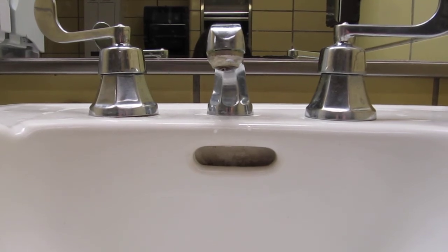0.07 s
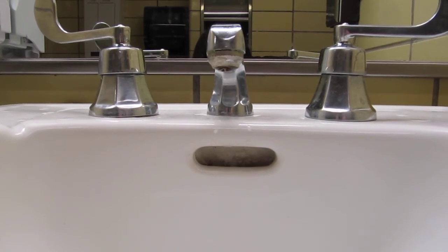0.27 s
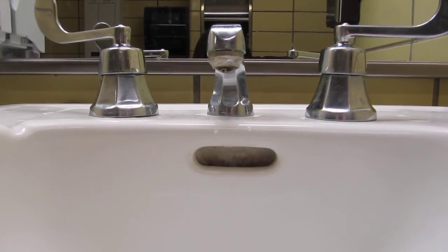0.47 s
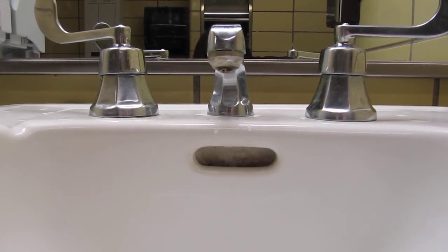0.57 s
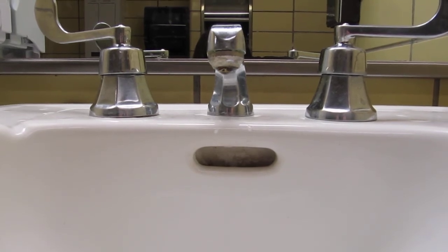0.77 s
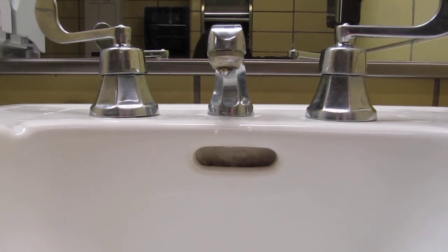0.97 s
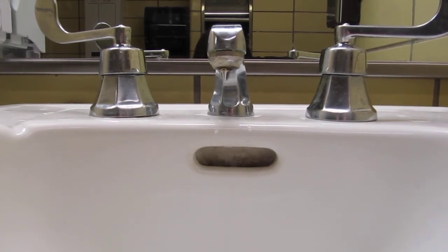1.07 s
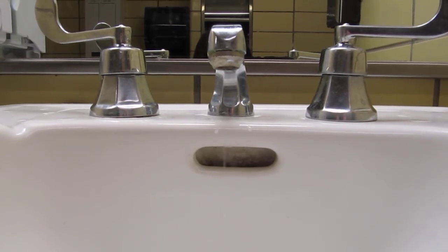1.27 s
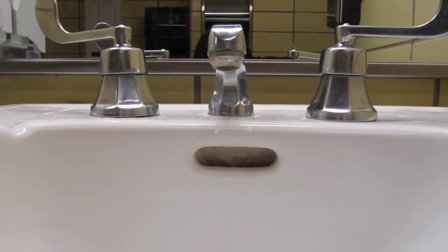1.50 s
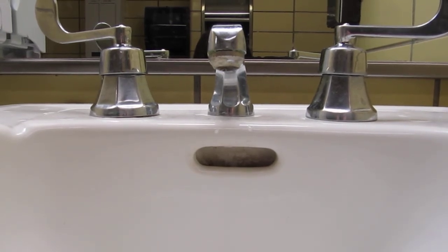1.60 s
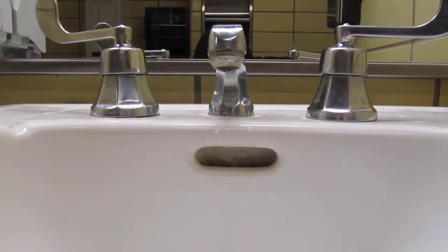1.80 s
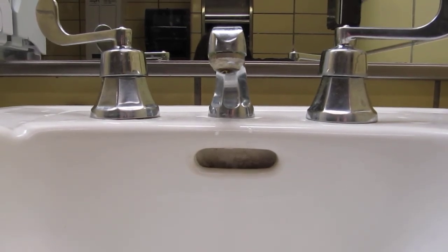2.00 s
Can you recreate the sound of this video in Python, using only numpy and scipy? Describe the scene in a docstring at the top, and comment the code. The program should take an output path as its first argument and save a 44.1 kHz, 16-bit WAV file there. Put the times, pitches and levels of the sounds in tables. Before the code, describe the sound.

A dripping faucet: one sharp plink with a very faint rebound, a pause, then a second similar plink and barely audible spray, heard close up in a reverberant tiled washroom with soft ventilation and electrical hum.

```python
"""A drop is heard first: a tick and a short plink from a leaky faucet over the wet drain of a porcelain sink.
Each impact is a noise burst; its trapped bubble is a decaying sine, and drain and basin ring as damped modes.
Bits of spray follow as faint high noise ticks, and the tiled washroom adds echoes and reverberation.
Behind lie ventilation as shaped noise, mains hum as harmonics, a thin lamp buzz and a steady whine."""
import sys
import numpy as np
from scipy import signal
from scipy.fft import rfft, irfft
from scipy.io import wavfile

SR = 44100
rng = np.random.default_rng(int(sys.argv[2]) if len(sys.argv) > 2 else 0)


def bounce(signal):
    """Save signal as a 16-bit WAV file at the path given by the first command-line argument."""
    frames = np.transpose(np.atleast_2d(signal))
    limited = np.clip(frames, -1, 1)
    pcm = np.round(limited * 32767).astype(np.int16)
    wavfile.write(sys.argv[1], SR, pcm)


N = 90404
T = np.arange(N) / SR   # time, s

# Drops landing in the drain, the weak one a rebound; ring and tick levels are relative to the drop:
# start_s, level_db, pitch_hz (bubble), t60_s (bubble), basin_db, tick_db, brightness_db (at the top of the colour)
DROPS = [(0.2083, -6, 1986, 0.038, 6.5, 3.5, 7), (0.3607, -27.5, 2177, 0.023, -13, -1, -6),
         (1.5205, -6.5, 1907, 0.029, 0.5, 2, -5)]
# Relative spectrum of the impact: frequency_hz, level_db
IMPACT_COLOUR = [(200, -43.5), (430, -10.5), (1200, 5), (3400, -1), (5500, 0), (6800, 6), (8800, -2),
                 (10700, 3.5), (11600, -8.5), (13700, -13), (15800, -19)]
# Damped modes of drain and basin, levels relative to each other: frequency_hz, level_db, t60_s
BASIN_MODES = [(467, -46.5, 0.2), (669, -45, 0.074), (1224, -41, 0.046), (1546, -30, 0.051),
               (2243, -5.5, .011), (2870, -22.5, 0.034), (2925, -24, 0.04), (3846, -51, 0.22),
               (4073, -29, 0.014), (4932, -39, 0.033), (6360, -48, .04), (9590, -32, 0.011),
               (9765, -24, 0.012)]
# Spray landing on the porcelain: start_s, level_db
SPRAY_DROPLETS = [(1.6335, -37), (1.733, -42)]
# Relative spectrum of the spray: frequency_hz, level_db
SPRAY_COLOUR = [(4000, -70), (7000, -22), (8700, -15), (9600, 6), (10800, -4), (11700, -14), (13000, -5),
                (14500, -33), (15800, -28)]
# Reflections from the bowl and the near wall: delay_s, level_db
EARLY_ECHOES = [(.003, -39), (.006085, -24), (.0218, -28)]
# Reverberation of the tiled room, levels relative between bands: frequency_hz, t60_s, level_db
ROOM_DECAY = [(400, 1.1, 7), (1200, 2.3, 8.5), (2000, 0.99, -4.5), (3040, 2.08, 1), (5000, .55, 14),
              (12000, 0.44, -7)]
# Spectral density of ventilation and hiss: frequency_hz, density_db (per Hz)
AIR_DENSITY = [(12, -66.5), (30, -66), (44, -78.5), (75, -67), (100, -84), (150, -76.5), (200, -84),
               (330, -89), (600, -91.5), (1000, -94.5), (2000, -99), (3500, -103), (6000, -104),
               (10300, -105), (11500, -111), (15500, -117)]
# Harmonics of the mains hum: multiple (of the mains frequency), level_db (rms)
HUM_HARMONICS = [(2, -54.5), (4, -60), (5, -67), (6, -59), (8, -64.5), (12, -73.5)]
# Weak random overtones of the lamp's buzz: frequency_hz, level_db (mean rms per overtone)
BUZZ_FLOOR = [(4000, -89), (5500, -99.5), (7000, -85), (8200, -83.5), (9000, -83.5), (10500, -86),
              (11200, -100)]
# Resonances of the buzzing lamp fitting: frequency_hz, level_db (rms of an overtone at the peak)
LAMP_RESONANCES = [(5039, -77), (5157, -81), (7074, -82), (7854, -76), (8096, -82), (8720, -78),
                   (8995, -80), (9593, -77), (9885, -73), (10330, -71)]

TICK_LEAD_S, TICK_T60_S, TICK_DB = 0.0006, 0.014, -33.5   # the impact comes just before the bubble
SPLASH_DB, SPLASH_T60_S = -20, 0.253   # a faint fizz lingers after the tick, level relative to it
BUBBLE_RISE_S, BASIN_RISE_S = 0.002, 0.0018
SPRAY_RISE_S, SPRAY_T60_S = 0.0013, 0.023
SCATTER_DB, SCATTER_T60_S = -16.5, 0.122
ROOM_DB, ROOM_ONSET_S = -21, 0.0046
MAINS_HZ, HUM_WAVER_DB = 59.965, 1.0
LAMP_WIDTH_HZ = 44
WHINE_HZ, WHINE_DB, WHINE_WAVER_DB = 7881, -73, 0.7
CUTOFF_HZ = 15800


def from_db(db):
    """A level in decibels is twenty times the logarithm of the amplitude gain."""
    return 10 ** (np.asarray(db) / 20)


def at_hz(points, hz):
    """A spectrum is interpolated linearly along a logarithmic frequency axis."""
    f, value = np.transpose(points)
    return np.interp(np.log(np.maximum(hz, 1)), np.log(f), value)


def noise(spectrum):
    """Filtering white noise gives it a chosen spectral density, in dB per Hz."""
    gain = from_db(at_hz(spectrum, np.arange(N // 2 + 1) * SR / N))
    return irfft(rfft(rng.standard_normal(N)) * gain, N) * np.sqrt(SR / 2)


def rms_one(x):
    """Normalization: division by the root mean square gives unit rms."""
    return x / np.sqrt(np.mean(x ** 2) + 1e-20)


def drift(rate_hz):
    """Low-pass noise of unit rms makes a slow random fluctuation."""
    hz = np.arange(N // 2 + 1) * SR / N
    white = rfft(rng.standard_normal(N))
    return rms_one(irfft(white / (1 + (hz / rate_hz) ** 2), N))


def envelope(start_s, rise_s, t60_s):
    """Exponential damping: a quick rise, then a decay of 60 dB in each t60."""
    age = np.maximum(T - start_s, 0)
    rise = 1 - np.exp(-age / max(rise_s, 1e-5))
    return rise * np.exp(-np.log(1000) * age / t60_s)


def ring(start_s, hz, rise_s, t60_s):
    """Free vibration: a damped mode sounds as a decaying sine."""
    return envelope(start_s, rise_s, t60_s) * np.sin(2 * np.pi * hz * (T - start_s))


def impact_tick(start_s, brightness_db):
    """Impact excitation: a brief broadband burst, followed by a weaker, longer splash."""
    top_hz = IMPACT_COLOUR[-1][0]
    colour = [(hz, db + brightness_db * (hz / top_hz) ** 2) for hz, db in IMPACT_COLOUR]
    impact = envelope(start_s - TICK_LEAD_S, 0.0001, TICK_T60_S)
    splash = from_db(SPLASH_DB) * envelope(start_s, 0.002, SPLASH_T60_S)
    return rms_one(noise(colour)) * (impact + splash)


def basin_ring(start_s):
    """Modal superposition: drain and basin ring as a sum of damped modes."""
    return sum(from_db(db) * ring(start_s, hz, BASIN_RISE_S, t60_s) for hz, db, t60_s in BASIN_MODES)


def drips():
    """Bubble resonance: trapped air pulsates at one pitch, and drain and basin swing against it."""
    out = np.zeros(N)
    for start_s, level_db, pitch_hz, t60_s, basin_db, tick_db, brightness_db in DROPS:
        tick = from_db(TICK_DB + tick_db) * impact_tick(start_s, brightness_db)
        bubble = ring(start_s, pitch_hz, BUBBLE_RISE_S, t60_s)
        basin = from_db(basin_db) * basin_ring(start_s)
        out += from_db(level_db) * (tick + bubble - basin)
    return out


def spray():
    """Small impacts: tiny droplets excite faint, very high noise ticks."""
    out = np.zeros(N)
    for start_s, level_db in SPRAY_DROPLETS:
        tick = rms_one(noise(SPRAY_COLOUR)) * envelope(start_s, SPRAY_RISE_S, SPRAY_T60_S)
        out += from_db(level_db) * tick
    return out


def reverberant_tail():
    """Reverberation: noise bands decay at their own rates, sooner in the treble."""
    tail = np.zeros(N)
    edges = np.geomspace(200, 16000, 10)   # band edges, Hz
    for low, high in zip(edges, edges[1:]):
        band_filter = signal.butter(2, [low, high], "band", fs=SR, output="sos")
        band = signal.sosfilt(band_filter, rng.standard_normal(N))
        centre_hz = np.sqrt(low * high)
        t60_s = at_hz([(hz, t60) for hz, t60, _ in ROOM_DECAY], centre_hz)
        level_db = at_hz([(hz, db) for hz, _, db in ROOM_DECAY], centre_hz)
        tail += from_db(level_db) * band * envelope(ROOM_ONSET_S, 0.0059, t60_s)
    return from_db(ROOM_DB) * tail * np.sqrt(2 * np.log(1000) / SR)


def washroom(x):
    """Room response: direct sound, discrete echoes, a short scatter and a long tail add together."""
    scatter = rng.standard_normal(N) * envelope(ROOM_ONSET_S, 0.0033, SCATTER_T60_S)
    scatter = from_db(SCATTER_DB) * rms_one(scatter) / np.sqrt(N)   # unit energy before its level
    echoes = sum(from_db(db) * np.interp(T - delay_s, T, x) for delay_s, db in EARLY_ECHOES)
    return x + echoes + signal.fftconvolve(x, reverberant_tail() + scatter)[:N]


def ventilation():
    """Broadband noise: moving air and hiss follow a continuous spectral density."""
    return noise(AIR_DENSITY)


def tone(hz, level_db, waver_db):
    """Amplitude modulation: a sine of fixed frequency wavers a little in level."""
    gain = np.sqrt(2) * from_db(level_db + waver_db * drift(9))   # rms to peak
    return gain * np.sin(2 * np.pi * (hz * T + rng.random()))


def mains_hum():
    """Harmonic series: the hum lies at whole multiples of the mains frequency."""
    return sum(tone(k * MAINS_HZ, db, HUM_WAVER_DB) for k, db in HUM_HARMONICS)


def lamp_buzz():
    """Periodic excitation: a rattle once a mains cycle gives overtones, strongest at the fitting's resonances."""
    order = np.arange(66, 188)
    hz = order * MAINS_HZ
    chance = rng.standard_normal(len(hz)) + 1j * rng.standard_normal(len(hz))
    overtones = from_db(at_hz(BUZZ_FLOOR, hz)) * chance / np.sqrt(2)
    for centre_hz, db in LAMP_RESONANCES:
        moment = np.exp(2j * np.pi * order * rng.random())   # random instant within the cycle
        response = 1 / (1 + 1j * (hz - centre_hz) / LAMP_WIDTH_HZ) ** 2
        overtones = overtones + from_db(db) * moment * response
    size = 8192   # samples in one stored cycle
    spectrum = np.zeros(size // 2 + 1, complex)
    spectrum[order] = overtones
    cycle = irfft(spectrum) * size / np.sqrt(2)
    return np.interp(T * MAINS_HZ % 1, np.arange(size) / size, cycle)


def whine():
    """Pure tone: one thin, high spectral line."""
    return tone(WHINE_HZ, WHINE_DB, WHINE_WAVER_DB)


def scene():
    """Superposition: water sounding in the room, over the steady background."""
    water = washroom(drips() + spray())
    background = ventilation() + mains_hum() + lamp_buzz() + whine()
    return (water + background)[None]


def record(dry):
    """Band limiting: the microphone drops the deepest rumble, and the top is cut steeply."""
    rumble_cut = signal.butter(2, 18, "high", fs=SR, output="sos")
    top_cut = signal.ellip(12, 0.1, 80, CUTOFF_HZ, fs=SR, output="sos")
    return signal.sosfilt(top_cut, signal.sosfilt(rumble_cut, dry))


dry = scene()
out = record(dry)
bounce(out)
```